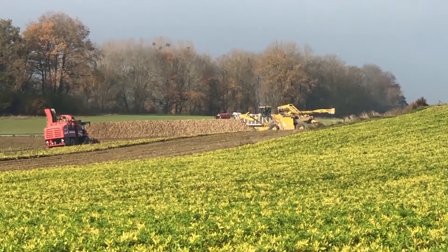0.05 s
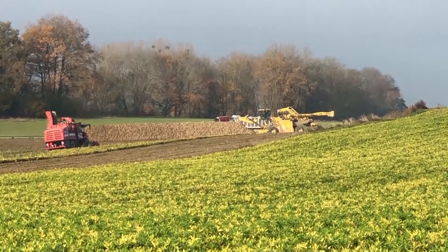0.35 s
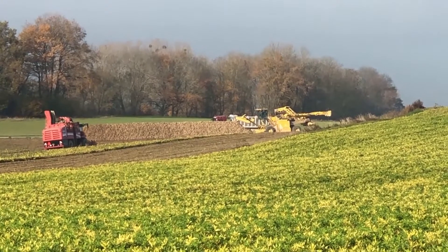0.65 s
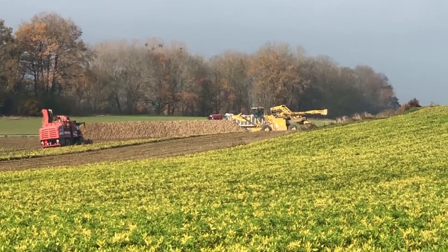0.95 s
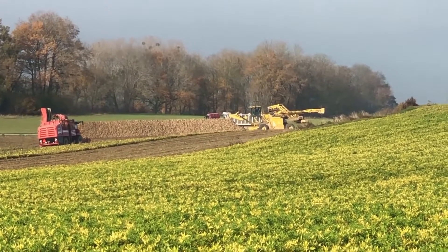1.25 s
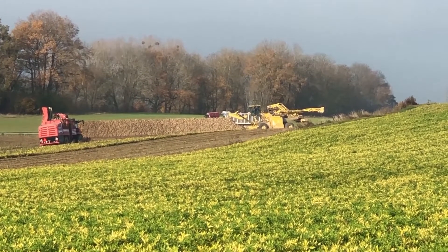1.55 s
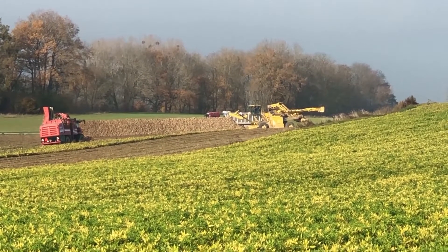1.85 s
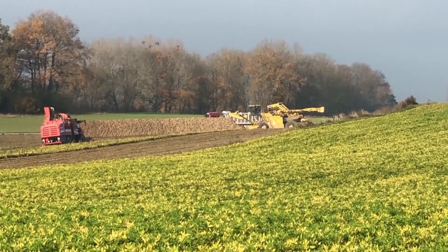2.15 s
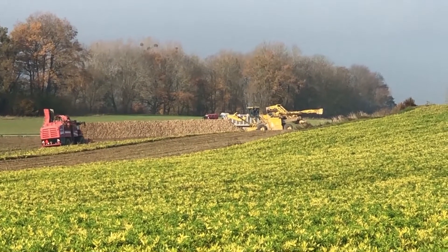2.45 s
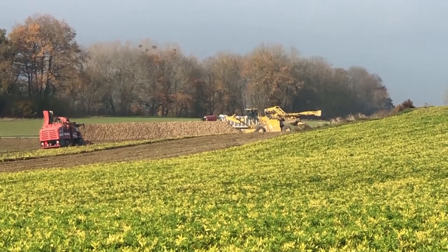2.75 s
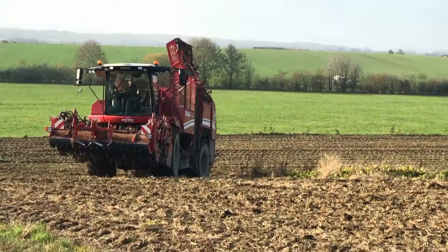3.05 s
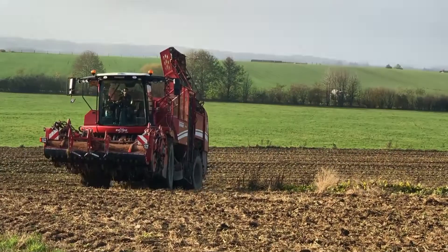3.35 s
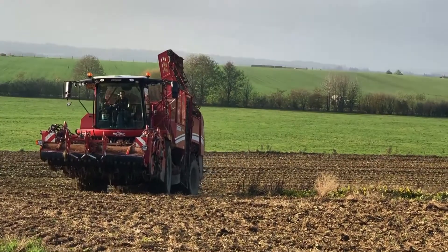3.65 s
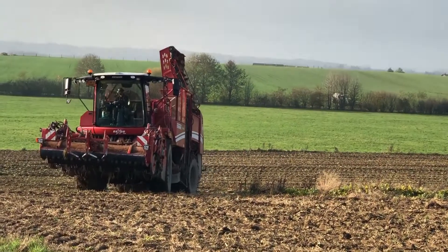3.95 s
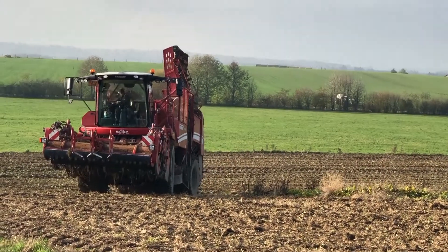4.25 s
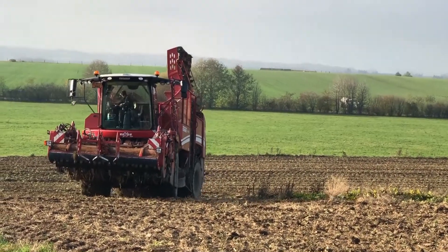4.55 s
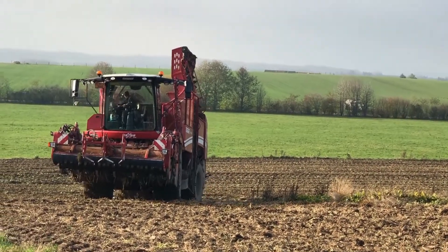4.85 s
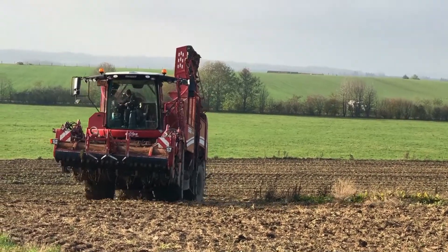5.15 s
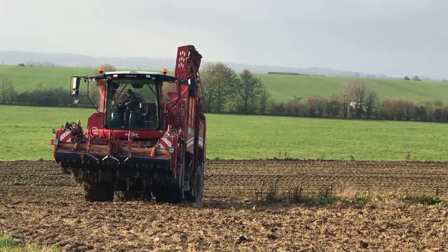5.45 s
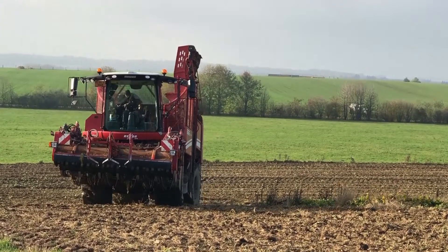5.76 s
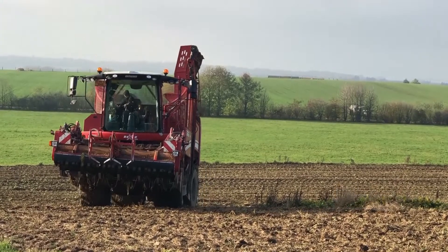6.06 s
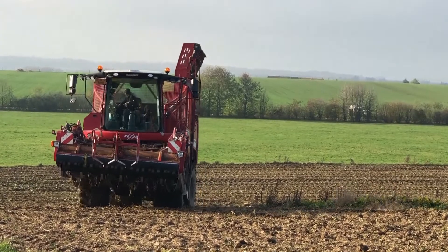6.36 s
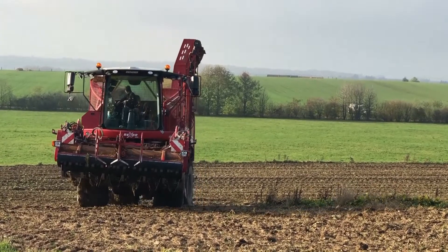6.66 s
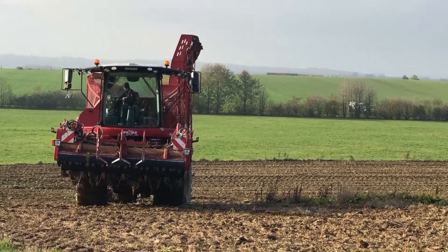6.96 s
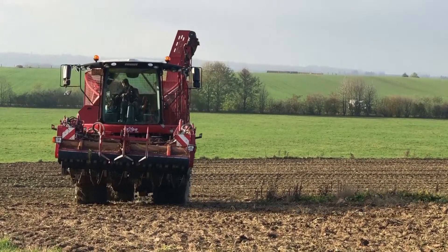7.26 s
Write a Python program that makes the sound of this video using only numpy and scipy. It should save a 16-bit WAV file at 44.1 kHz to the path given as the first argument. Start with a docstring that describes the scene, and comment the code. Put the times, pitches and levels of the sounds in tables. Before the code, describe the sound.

A distant diesel engine throbs in light wind, then a beet harvester drives close by with a heavy boom and rattling machinery.

```python
"""A distant diesel exhaust throbs and hisses with every firing while wind bumps the microphone.
After a short silence the same six-cylinder beet harvester drives close by: a heavy boom, rattling
machinery, a pump hum, gear and turbo whine, one metal squeak and two ticks.
The boom is the fundamental of the firing rate. Rotating parts sound at fixed multiples (orders) of
the crank rate, and the pulsed gas flow modulates the amplitude of turbulent noise."""
import sys
import numpy as np
from scipy import signal
from scipy.fft import rfft, irfft
from scipy.io import wavfile

SR = 44100
rng = np.random.default_rng(int(sys.argv[2]) if len(sys.argv) > 2 else 0)


def dump_mix(stems):
    """Bounce the given channels to the path in sys.argv[1] as a 16-bit WAV at rate SR."""
    frames = np.atleast_2d(stems).T  # one column per channel
    limited = np.clip(frames, -1, 1)  # hard clip at full scale
    pcm = np.round(limited * 32767).astype(np.int16)
    wavfile.write(sys.argv[1], SR, pcm)


N = 331191
TIME = np.arange(N) / SR
FAR_SPAN_S, NEAR_SPAN_S = (0, 2.908), (3.073, 7.6)
# the distant boom swells once, later the sound drops abruptly: start t/s, duration t/s
SWELL, DROP = (0.59, 0.17), (2.13, 0.012)

# spectrum of the close hiss and of the squeak's grit: f/Hz, level/dB
HISS_SPECTRUM = [(700, -0.5), (1200, 4.5), (1650, 5), (2100, -1), (3300, 0.5), (4700, -3.5), (5500, -7),
                 (6500, -6), (7500, -9.5), (8400, -2.5), (10000, -15), (12000, -19.5), (13500, -19),
                 (15500, -27)]


def amp(db):
    """Amplitude ratio of a level in decibels."""
    return 10 ** (np.asarray(db) / 20)


def unit_rms(x):
    """Normalisation to unit mean power."""
    return x / np.sqrt(np.mean(x ** 2) + 1e-20)


def curve(rows):
    """Linear interpolation of (t/s, value) rows over time."""
    return np.interp(TIME, *np.transpose(rows))


def ramp(start, length):
    """Linear transition from zero to one, then held."""
    return np.clip((TIME - start) / length, 0, 1)


def bump(s, half_length):
    """Gaussian envelope, one at time s."""
    return np.exp(-((TIME - s) / half_length) ** 2)


def add(mix, s, sound):
    """Superposition of a sound starting at time s."""
    part = mix[round(s * SR):][:len(sound)]
    part += sound[:len(part)]


def colour(x, spectrum):
    """Spectral shaping by (f/Hz, level/dB) rows, with skirts of 36 dB per octave; rms one."""
    hz, db = np.transpose(spectrum)
    f = np.fft.rfftfreq(len(x), 1 / SR) + 1
    octaves_outside = np.maximum(np.log2(hz[0] / f), 0) + np.maximum(np.log2(f / hz[-1]), 0)
    gain = amp(np.interp(np.log(f), np.log(hz), db) - 36 * octaves_outside)
    return unit_rms(irfft(rfft(x) * gain, len(x)))


def noise(spectrum, n=N):
    """Gaussian noise of a given spectrum; rms one."""
    return colour(rng.standard_normal(n), spectrum)


def drift(hz):
    """Random fluctuation, low-passed at hz; rms one."""
    size = 8192
    f = np.fft.rfftfreq(size, N / SR / size)
    slow = unit_rms(irfft(rfft(rng.standard_normal(size)) / (1 + (f / hz) ** 4)))
    return np.interp(TIME, np.linspace(0, TIME[-1], size), slow)


def resonance(hz, width_hz):
    """Noise-driven resonance with a fixed or moving centre frequency; rms one."""
    pole = np.exp(-np.pi * width_hz / SR)
    drive = rng.standard_normal(N) + 1j * rng.standard_normal(N)
    envelope = signal.lfilter([1], np.poly([pole, pole]), drive)
    carrier = np.exp(2j * np.pi * np.cumsum(np.full(N, hz)) / SR)
    return unit_rms((envelope * carrier).real)


def revolutions(firing_hz, start=0):
    """Crank angle in revolutions: the integral of the firing rate, at three firings a turn."""
    firings = np.cumsum(firing_hz) / SR
    return (firings - firings[round(start * SR)]) / 3


def orders(crank, table, waver_db, waver_hz, slip_rad):
    """Tones at multiples of a rotation rate, each randomly modulated in level and phase."""
    out = np.zeros(N)
    for order, db in table:
        gain = amp(db + waver_db * drift(waver_hz))
        out += gain * np.cos(2 * np.pi * order * crank + slip_rad * drift(waver_hz))
    return np.sqrt(2) * out


def boom(crank):
    """The exhaust's fundamental, one pressure cycle per firing; rms one."""
    return np.sqrt(2) * np.cos(2 * np.pi * 3 * crank)


def puffs(crank, cylinders_db, lag, sharpness, skew, floor, uneven_db):
    """Pulsating flow: one gust per firing, delayed by lag cycles and made asymmetric by skew."""
    cycle = 3 * crank - lag + 6  # six firings ahead keeps the index positive
    firing = np.floor(cycle + .5).astype(int)
    count = firing.max() + 1
    size = amp(np.resize(cylinders_db, count) + uneven_db * rng.standard_normal(count))
    angle = 2 * np.pi * cycle - skew * (1 - np.cos(2 * np.pi * cycle))
    return unit_rms(floor + size[firing] * np.exp(sharpness * (np.cos(angle) - 1)))


def turning(start_db, change_db):
    """Directivity: a layer's gain as the close machine turns steadily to face the listener."""
    start, end = NEAR_SPAN_S
    return amp(start_db + change_db * ramp(start, end - start))


def during(span):
    """Rectangular window: one inside the span, zero outside."""
    return (TIME >= span[0]) & (TIME < span[1])


def wind():
    """Turbulent pressure at the microphone: low, lumpy gusts and a few short buffets."""
    # gusts: t/s, half length t/s, peak level/dB
    gusts = [(.64, 0.093, -33), (0.956, 0.056, -36), (1.31, 0.59, -37), (2.028, 0.16, -36.5),
             (2.378, 0.068, -34), (2.79, 0.1, -35)]
    # buffets: t/s, relative peak level/dB
    buffets = [(0.56, -29), (0.615, -25), (0.699, -25), (2.32, -25), (2.562, -28), (2.637, -20),
               (2.712, -25)]
    # spectra of the gusts and of a buffet: f/Hz, level/dB
    gust_spectrum = [(15, -25), (35, -7.5), (60, -5), (90, 2.5), (150, -1.5), (200, -3), (260, -21.5),
                     (400, -33), (800, -55.5)]
    buffet_spectrum = [(25, -23), (80, 15), (160, 2.5), (300, -7.5), (450, -29.5), (1000, -71)]
    lumps = unit_rms(amp(1.6 * drift(25)))
    calm = amp(-43 - 10 * ramp(*DROP))
    gust_power = sum((amp(db) * bump(s, half)) ** 2 for s, half, db in gusts)
    out = np.sqrt(calm ** 2 + gust_power) * noise(gust_spectrum) * lumps
    age = TIME[:SR // 8] / 0.011  # in rise times
    for s, db in buffets:
        push = noise(buffet_spectrum, len(age)) * age * np.exp(-age)
        add(out, s, amp(db + 2) * push / abs(push).max())
    return out


def far_exhaust(crank):
    """Harmonic series of the distant exhaust: the boom, a drone and high orders from the pipe."""
    # low overtones and pipe tones: crank order, level/dB
    drone_orders = [(6, -10), (9, 1.5), (12, -14)]
    pipe_orders = [(20, -7), (22, -3), (23, -4), (24, -12.5), (25, -3), (26, -4.5), (27, -6), (29, -9.5)]
    swell, drop = ramp(*SWELL), ramp(*DROP)
    drone = orders(crank, drone_orders, waver_db=1.6, waver_hz=10.7, slip_rad=0.48)
    pipe = orders(crank, pipe_orders, waver_db=2, waver_hz=1.6, slip_rad=0.31)
    return (amp(-33.5 + 9 * swell - 8.5 * drop) * boom(crank)
            + amp(-35 - 2.5 * TIME - 7.5 * drop) * drone
            + amp(-54.5 - 9 * drop) * pipe)


def far_gas(crank):
    """Amplitude-modulated flow noise: every firing blows out rasp and hiss."""
    # each cylinder's puff, in firing order: level/dB
    cylinders = [-1, -1.8, 2, .4, -1.3, 1]
    # four bands of flow noise, low to high: f/Hz, level/dB
    rasp_spectrum = [(250, -9.5), (350, -8.5), (520, 0), (760, -8), (1020, 1), (1300, -5.5), (1550, -5),
                     (2050, -14.5), (2500, -11.5)]
    hiss_spectrum = [(1700, -32), (2150, -13), (2450, 3), (2750, -1.5), (3600, 2.5), (4150, -1), (4650, 2),
                     (5400, -6.5), (6500, -52)]
    fizz_spectrum = [(4600, -14), (5600, 0), (6900, -0.5), (7800, -11.5), (9000, -35.5)]
    top_spectrum = [(7000, -14), (8000, 0.5), (9200, 4), (10500, -9), (13000, -15), (16000, -20)]
    # envelope of the fizz: t/s, relative level/dB
    fizz_levels = [(0.03, -55.5), (0.49, -58), (0.72, -48.5), (1.41, -54), (1.7, -65), (2.07, -56),
                   (2.79, -72.5), (2.88, -77.5)]
    swell, drop = ramp(*SWELL), ramp(*DROP)
    floor = .38 - .19 * swell  # steady flow between the puffs
    slow_gas = puffs(crank, cylinders, lag=.19, sharpness=2.4, skew=.56, floor=.69, uneven_db=2)
    fast_gas = puffs(crank, cylinders, lag=.33, sharpness=2.1, skew=.25, floor=floor, uneven_db=1.5)
    rasp = amp(-42 - 9 * drop) * noise(rasp_spectrum)
    # one resonance opens and stays; a higher one surges twice
    swish = amp(-0.5) * ramp(1.42, 0.29) * resonance(3640, width_hz=990)
    surges = (amp(-0.93) * bump(1.18, 0.19) + bump(2.099, 0.24)) * resonance(4850, width_hz=700)
    hiss_db = -45.5 - 11.5 * np.maximum(TIME - DROP[0], 0)
    hiss = amp(hiss_db) * (noise(hiss_spectrum) + swish + surges)
    fizz = amp(curve(fizz_levels) + 0.5) * noise(fizz_spectrum)
    top_db = -68.5 + 9 * (swell - ramp(1.52, 0.26)) - 17 * drop
    top = amp(top_db) * noise(top_spectrum) * unit_rms(fast_gas + 1)  # half steady
    return rasp * slow_gas + (hiss + fizz) * fast_gas + top


def far_engine():
    """Phase locking: the distant tones and gas puffs follow one crank."""
    # firing rate: t/s, f/Hz
    firing_rate = [(0, 62.4), (.2, 63.11), (.45, 62.5), (.7, 62.13), (1.3, 61.64), (1.9, 62.28),
                   (2.2, 62.64), (2.55, 63.58), (2.9, 65.05)]
    crank = revolutions(curve(firing_rate), start=.009)
    return far_exhaust(crank) + far_gas(crank)


def ticks():
    """Two sharp ticks, each the impulse response of a bright filter."""
    # ticks: t/s, peak level/dB
    events = [(4.4218, -15), (4.891, -41)]
    # spectrum of a tick: f/Hz, level/dB
    spectrum = [(3000, -22), (8000, -9), (11000, -4), (14500, 0), (16500, -4)]
    out = np.zeros(N)
    tick = colour(signal.unit_impulse(128, "mid"), spectrum)
    for s, db in events:
        add(out, s - len(tick) / 2 / SR, amp(db) * tick / abs(tick).max())
    return out


def squeak():
    """Friction excites modes: steel catches twice, and a gritty scrape swells into a decaying ring."""
    # catches: t/s, relative level/dB, rise t/s, 60 dB decay t/s
    catches = [(3.602, -26.5, 0.01, 0.079), (3.638, -27.5, 0.0061, 0.17)]
    # modes of the steel part: f/Hz, level/dB
    modes = [(1270, -12.5), (2295, 2), (3847, -13), (4213, -12.5), (6150, -23), (8590, -15), (10980, -22)]
    out, t = np.zeros(N), TIME[:SR // 4]
    for s, db, rise, t60 in catches:
        ring = sum(amp(mode_db) * np.sin(2 * np.pi * hz * t + 0.37 * drift(140)[:len(t)])
                   for hz, mode_db in modes)
        grit = amp(-7.5) * noise(HISS_SPECTRUM, len(t)) * np.exp(-t / 0.011)
        envelope = np.minimum(t / rise, 1) * amp(-60 * np.maximum(t - rise, 0) / t60)
        add(out, s, amp(db + 2) * (ring * envelope + grit))
    return out


def whine():
    """A thin, slightly modulated tone of steady pitch comes and goes."""
    hz = 1217
    tone = orders(TIME, [(hz, 0)], waver_db=1.5, waver_hz=8.7, slip_rad=0.86)
    return amp(-49.5) * bump(5.55, 0.57) * tone


def turbo():
    """Moving air modulates the turbocharger's whistle, set in a narrow band of rushing noise."""
    # pitch of the whistle: t/s, f/Hz
    pitch = [(3.07, 8320), (3.5, 8410), (3.95, 8330), (4.65, 8275), (5.3, 8530), (5.75, 8525), (6.55, 8355),
             (7.25, 8530)]
    hz = curve(pitch)
    phase = 2 * np.pi * np.cumsum(hz + 4 * drift(22.6)) / SR
    flutter = unit_rms(amp(3.8 * drift(20)))
    whistle = np.sqrt(2) * np.cos(phase) * flutter
    gain = turning(-48 + 7 * bump(3.71, .28), change_db=-17.5)
    return gain * (whistle + amp(-10) * resonance(hz, width_hz=450))


def gears(crank, sag_hz):
    """Tooth meshing gives high orders, which grow with load and swell once for a while."""
    # gear tones: crank order, level/dB
    mesh_orders = [(54.9, -2.5), (69.9, 0), (82.1, -8), (95.7, -8)]
    gain = turning(-56.5 + 3 * sag_hz + 7.5 * bump(4.18, 0.65), change_db=-5.5)
    return gain * orders(crank, mesh_orders, waver_db=2.5, waver_hz=6.5, slip_rad=0.38)


def pump(crank):
    """The hydraulic pump hums at one crank order; it takes up work and stays loud."""
    order, idle_db, work_db = 13.7, -47.5, 10
    hum = orders(crank, [(order, 0)], waver_db=1.5, waver_hz=6.2, slip_rad=0.36)
    return amp(idle_db + work_db * ramp(4.52, 1)) * hum


def machinery(crank):
    """Forced vibration: the block knocks each turn and the rattle each firing, amid rumble and hiss."""
    # spectra of the rumble and the rattle: f/Hz, level/dB
    rumble_spectrum = [(15, -23.5), (35, -16.5), (60, 3.5), (100, -10), (145, 1), (190, -2), (250, -9.5),
                       (340, -15.5), (600, -45)]
    rattle_spectrum = [(200, -4), (340, -11), (390, -4), (460, 2), (620, 0.5), (700, -6.5), (950, -3.5),
                       (1400, -19.5), (2000, -42), (3500, -44)]
    # engine block tones: crank order, level/dB
    block_orders = [(19, -1), (20, -2), (21, -3), (22, 0), (23, -1.5), (25, -15), (26, -1), (27.4, -0.5)]
    # each cylinder's puff, in firing order: level/dB
    cylinders = [-7, 2, 4, -2, -7, 5]
    rumble = turning(-31, change_db=2.5) * noise(rumble_spectrum)
    block = orders(crank - 1 / 3, block_orders, waver_db=2.2, waver_hz=2.5, slip_rad=.45)
    chug = puffs(crank, cylinders, lag=.13, sharpness=3, skew=.65, floor=.8, uneven_db=1.4)
    rattle = turning(-38, change_db=3) * (amp(-10.5) * block + noise(rattle_spectrum) * chug)
    hiss = turning(-39.5, change_db=-7.5) * noise(HISS_SPECTRUM) * amp(0.67 * drift(30))
    return rumble + rattle + hiss


def near_exhaust(crank, sag_hz):
    """Periodic gas pulses radiate a heavy boom whose harmonics grow with load."""
    # exhaust overtones: crank order, level/dB
    overtones = [(6, -15.5), (9, -18.5), (12, -30)]
    lag_turns, db_per_hz = 1 / 24, 1  # the overtones leave the pipe just after the firing
    drone = orders(crank - lag_turns, overtones, waver_db=1.6, waver_hz=9, slip_rad=0.25)
    fundamental = boom(crank) * amp(0.22 * drift(13))
    return turning(-13, change_db=1.26) * (fundamental + amp(db_per_hz * sag_hz - .8) * drone)


def near_engine():
    """Phase locking: one crank drives the close exhaust, machinery, pump and gears."""
    # firing rate: t/s, f/Hz
    firing_rate = [(3.1, 66.97), (3.35, 68.0), (3.65, 69.01), (3.95, 68.19), (4.45, 67.93), (4.8, 66.24),
                   (5.05, 66.44), (5.3, 68.03), (5.75, 68.38), (6.1, 68.82), (6.4, 68.35), (6.7, 66.38),
                   (6.95, 66.73), (7.2, 67.78), (7.5, 69.22)]
    firing_hz = curve(firing_rate)
    crank = revolutions(firing_hz)
    sag_hz = 68 - firing_hz  # load drags the engine below its set speed
    return near_exhaust(crank, sag_hz) + machinery(crank) + pump(crank) + gears(crank, sag_hz)


def scene():
    """Superposition of the distant sources, then of the close ones, each over a faint airy hiss."""
    far = far_engine() + wind()
    air = noise([(8000, -7), (12000, 3), (16000, -9)])
    near = near_engine() + whine() + turbo() + squeak() + ticks()
    far += amp(-83.5) * air
    near += amp(-62.5) * air
    return (far * during(FAR_SPAN_S) + near * during(NEAR_SPAN_S))[None]


def record(dry):
    """Band limiting by a linear-phase low-pass filter."""
    cutoff_hz = 15900
    lowpass = signal.firwin(511, cutoff_hz, window=("kaiser", 9), fs=SR)
    return signal.oaconvolve(dry, lowpass[None], "same")


dry = scene()
out = record(dry)
dump_mix(out)
```